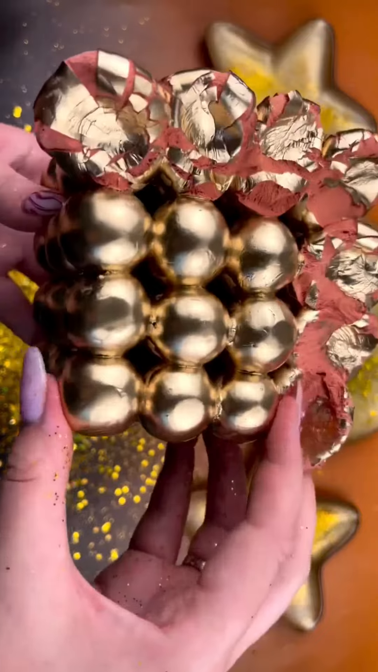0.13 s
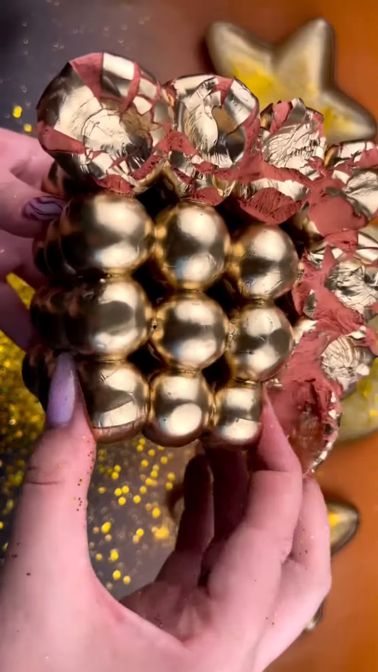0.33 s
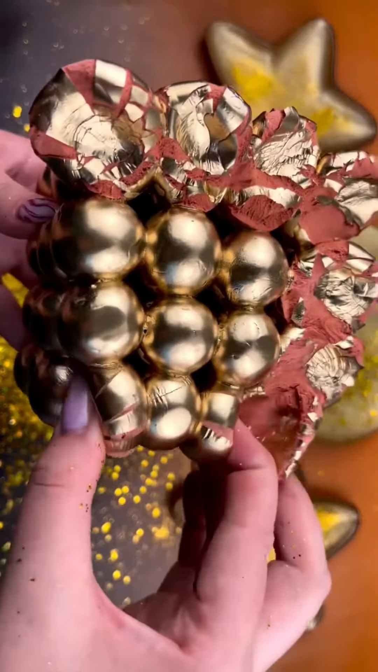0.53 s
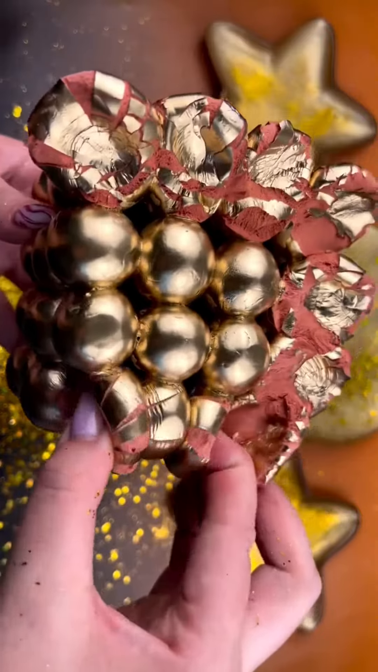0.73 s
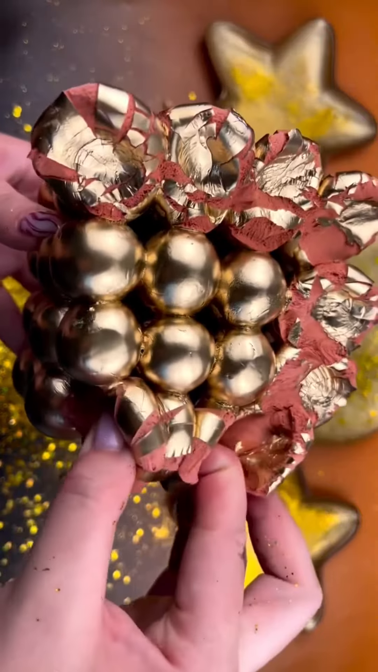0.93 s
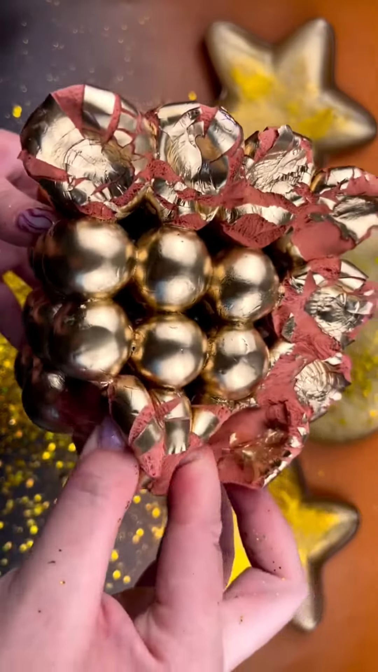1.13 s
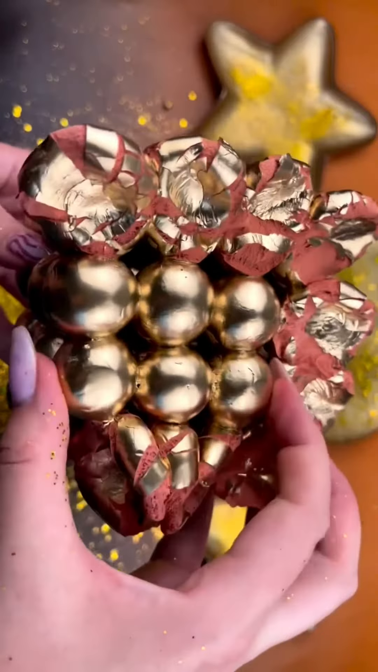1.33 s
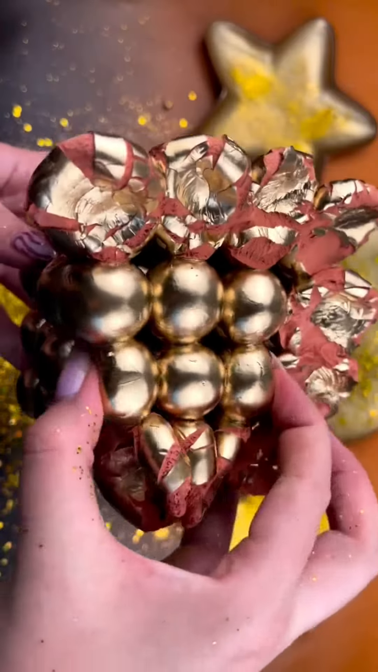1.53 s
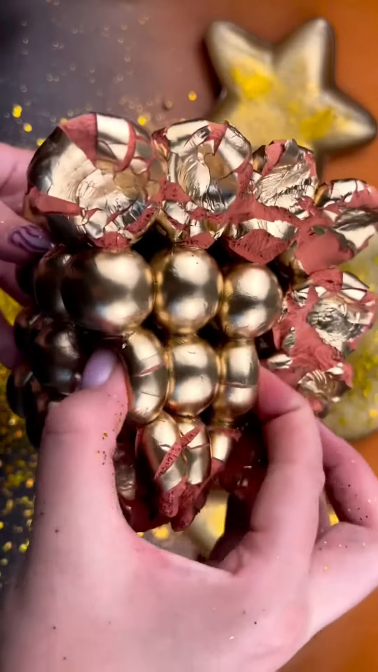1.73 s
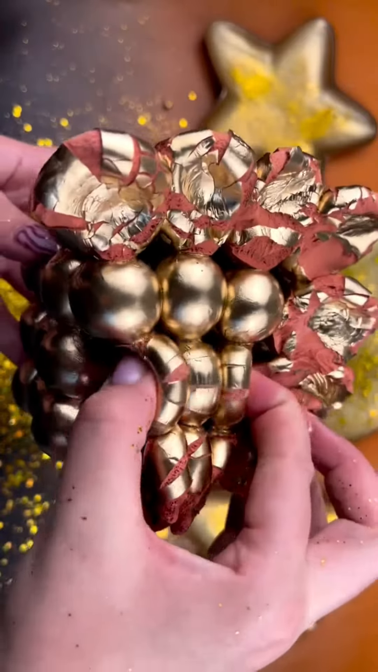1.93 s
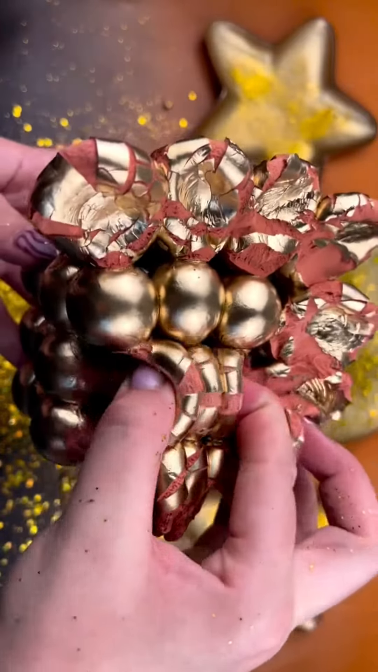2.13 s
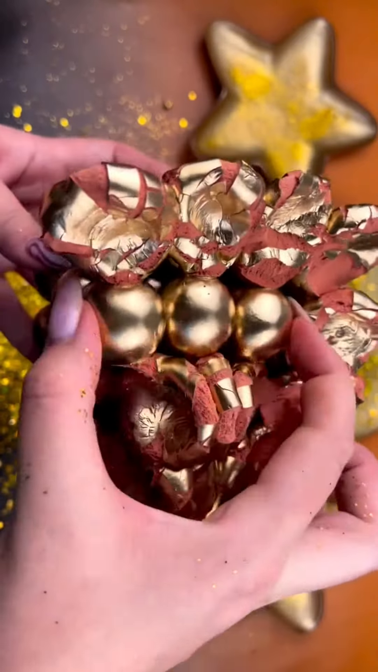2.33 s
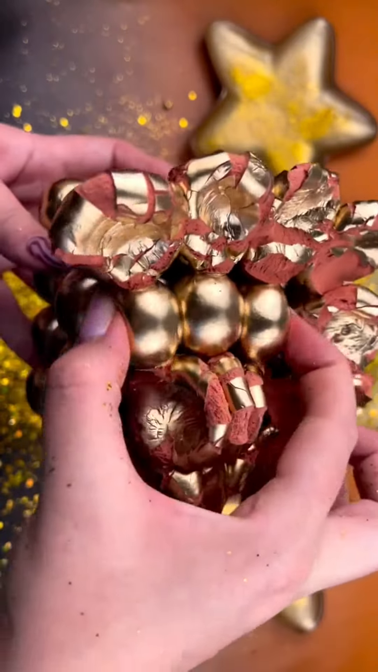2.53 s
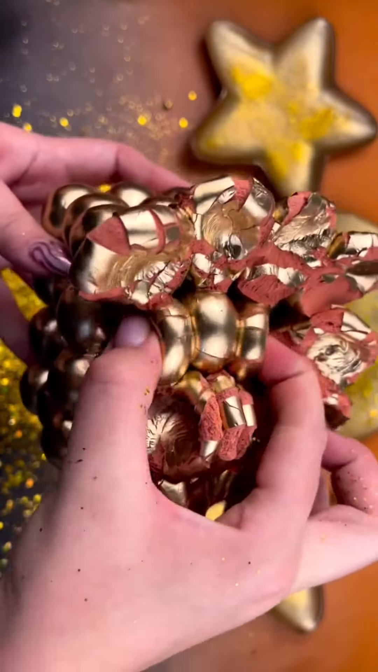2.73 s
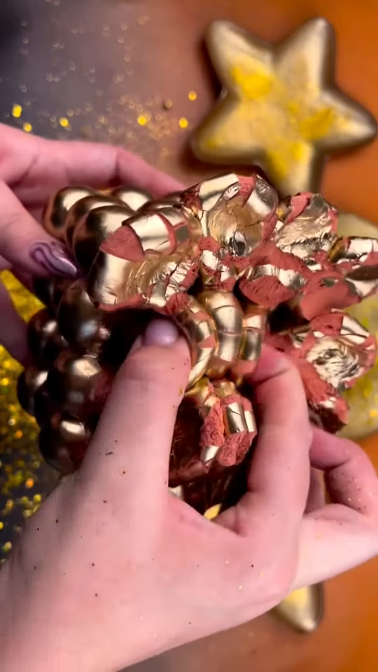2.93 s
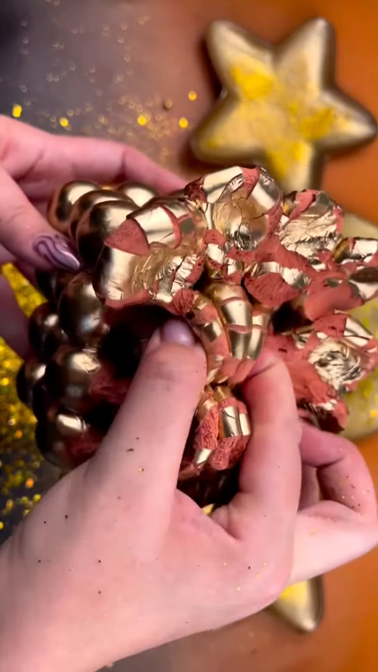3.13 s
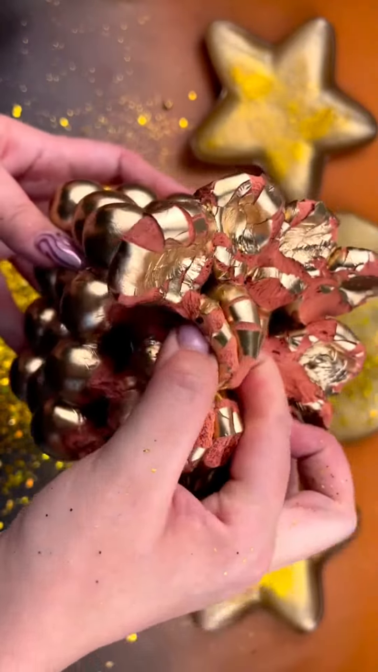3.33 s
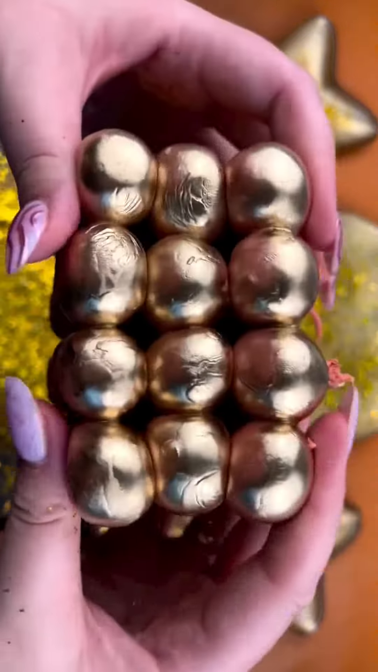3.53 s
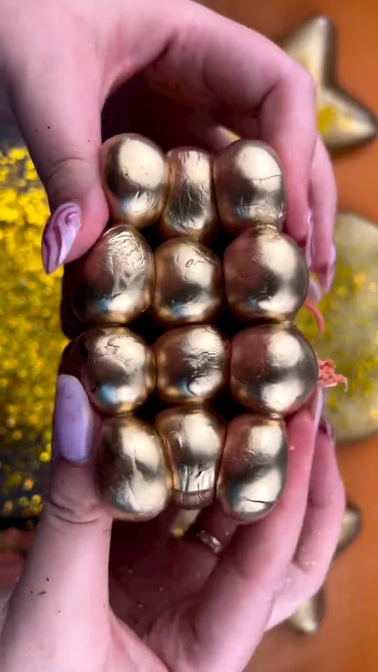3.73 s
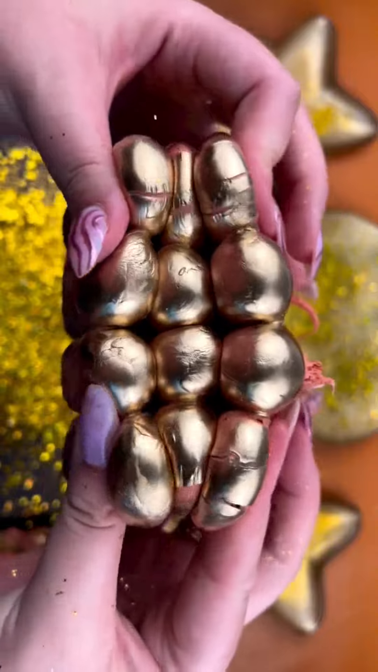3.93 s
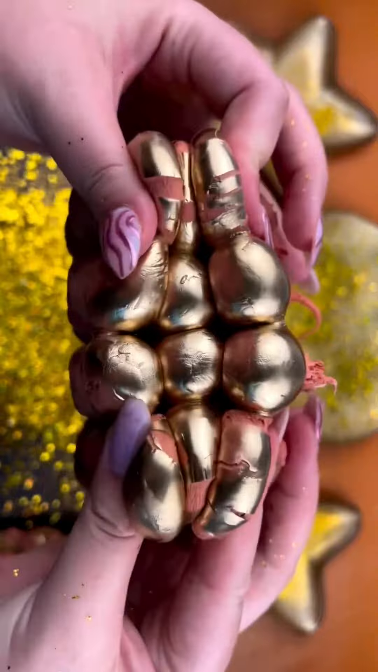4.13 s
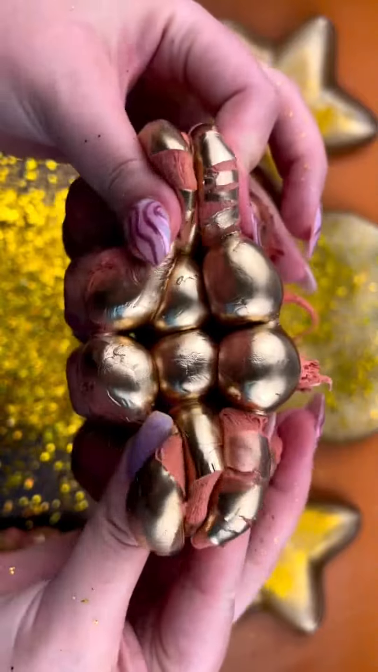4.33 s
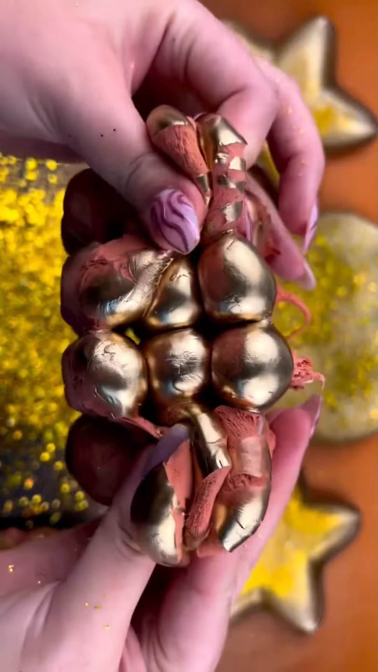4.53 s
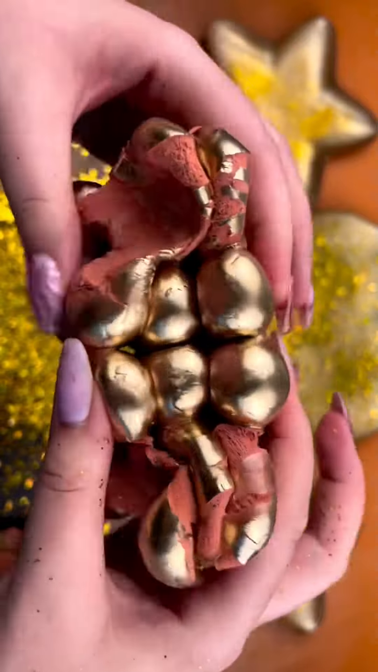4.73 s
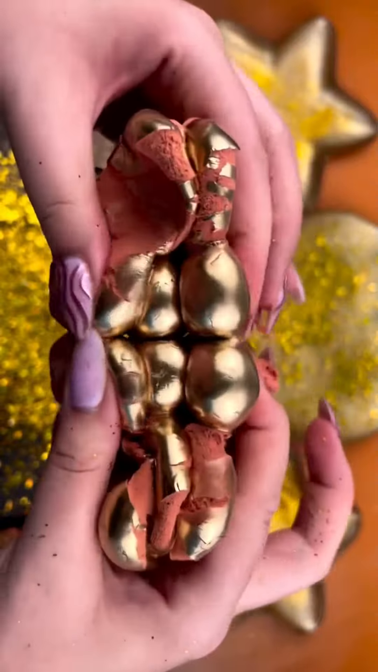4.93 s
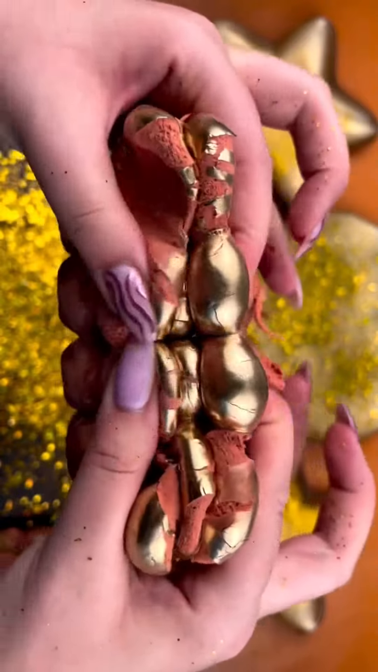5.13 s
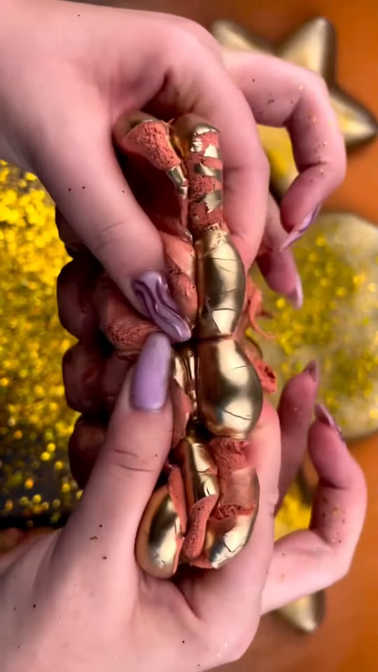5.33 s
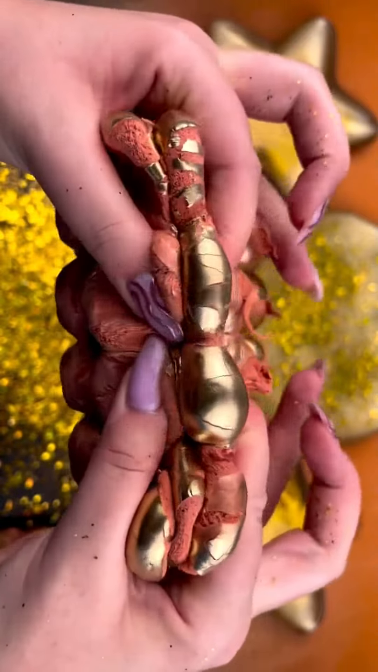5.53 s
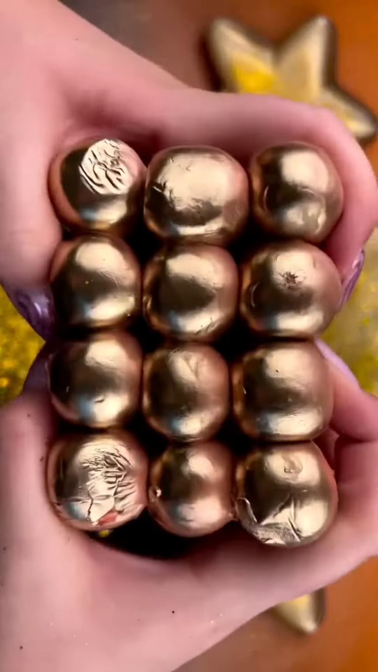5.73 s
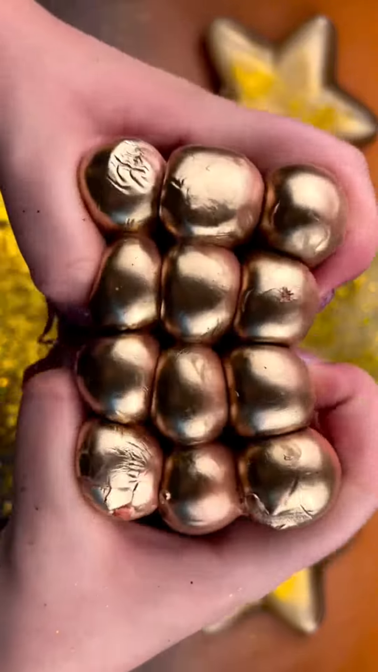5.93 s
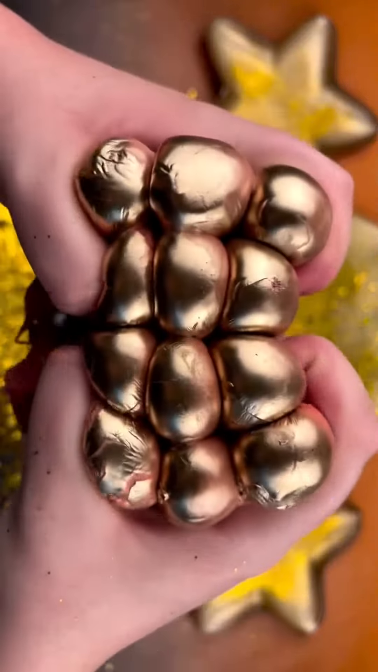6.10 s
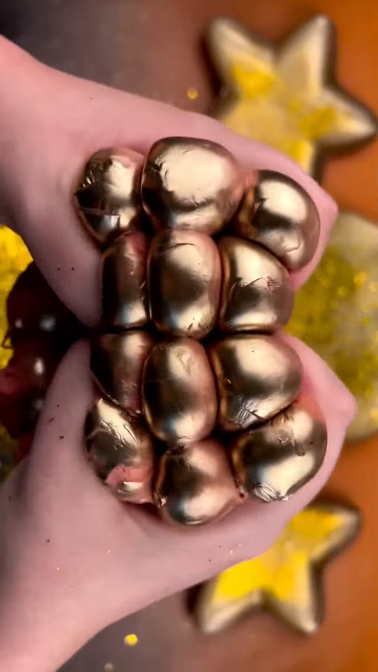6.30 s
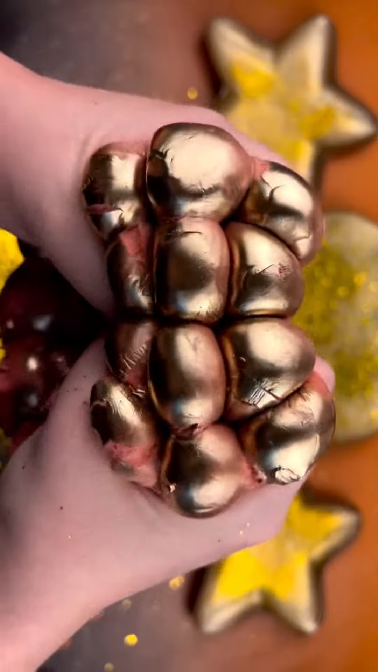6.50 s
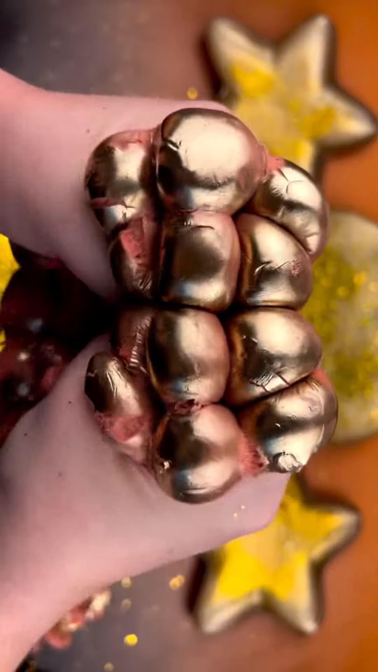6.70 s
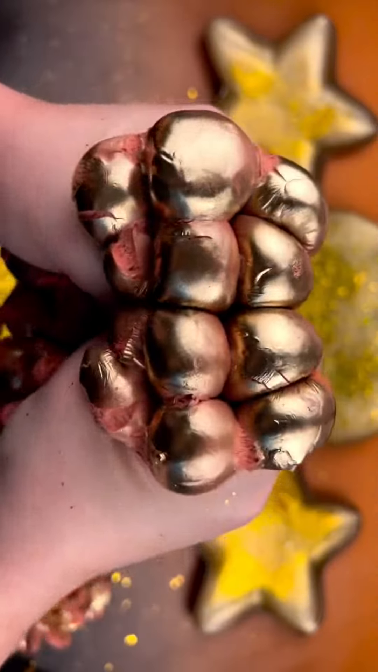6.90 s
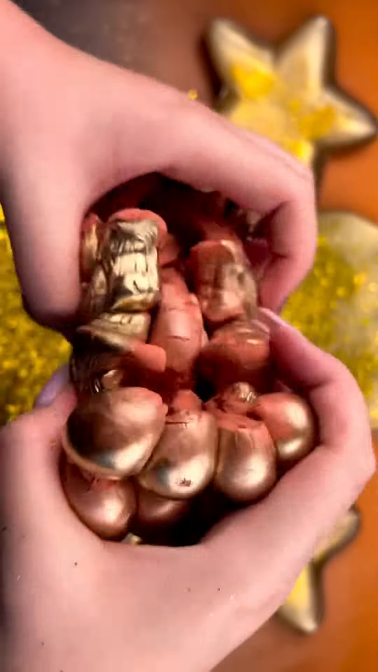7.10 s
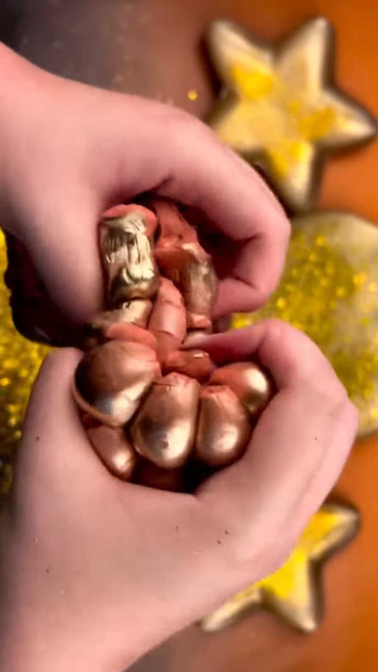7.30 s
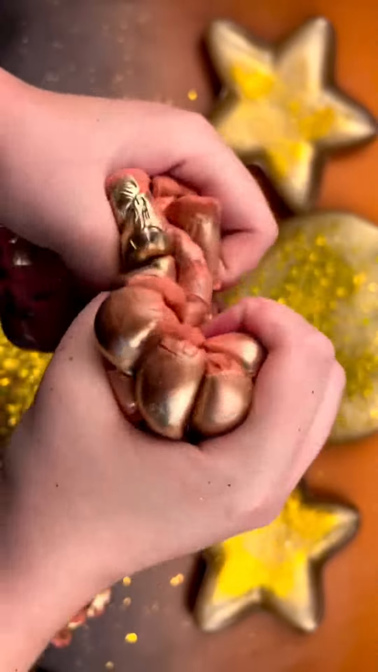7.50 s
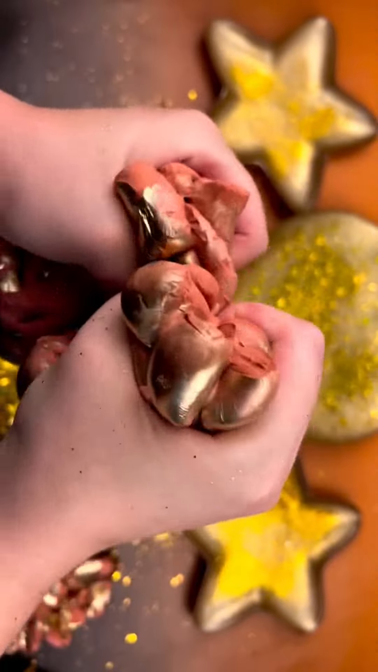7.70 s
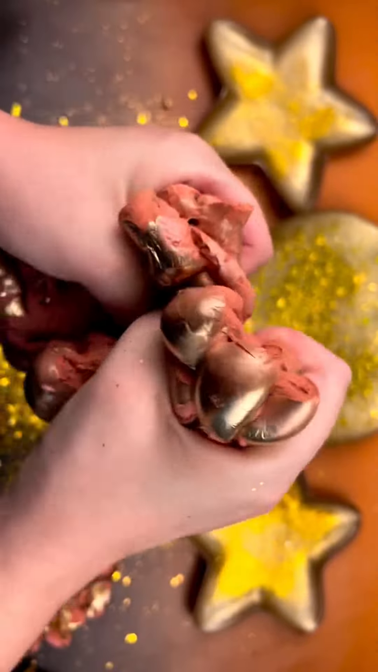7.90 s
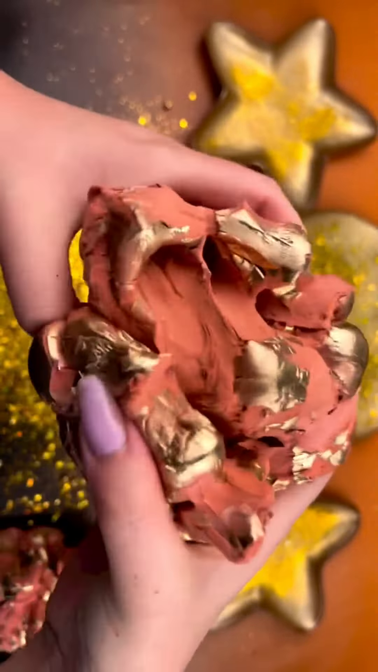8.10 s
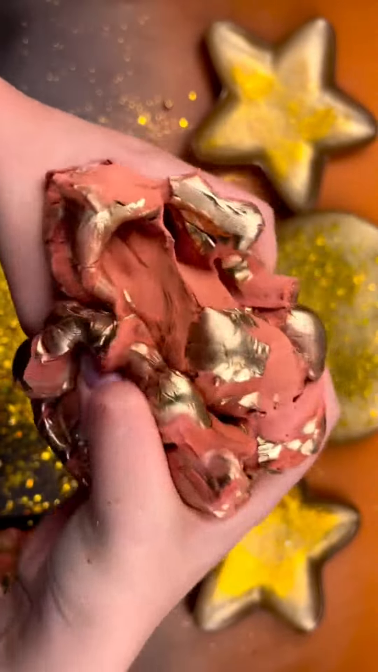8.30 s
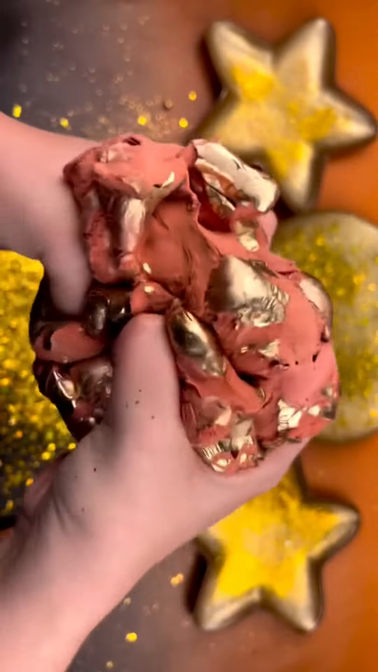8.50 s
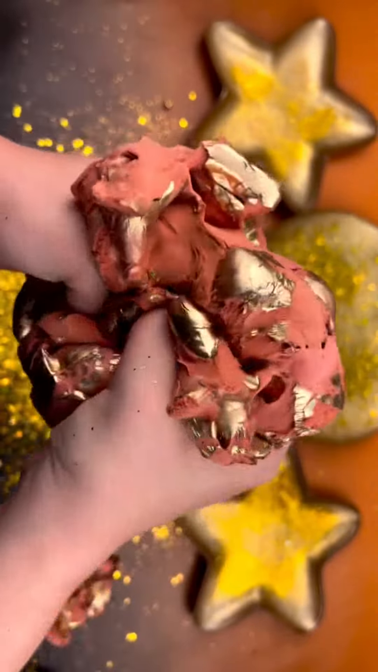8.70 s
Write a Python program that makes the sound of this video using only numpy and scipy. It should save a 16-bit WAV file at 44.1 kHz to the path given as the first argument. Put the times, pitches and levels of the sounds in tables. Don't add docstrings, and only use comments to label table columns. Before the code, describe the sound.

Crisp, dry cracking of a brittle shell on soft clay, near and detailed. Early snaps ring slightly hollow, as unbroken balls resonate; later ones are drier and thicker. Squeezes come in bursts, each a flurry of clicks, ticks and crinkles with a few soft low pops, thinning to near silence before the next. The thickest crunch comes past the middle. Faint room rumble and hiss, very little reverberation.

```python
import sys
import numpy as np
from scipy import signal
from scipy.fft import rfft, irfft, next_fast_len
from scipy.io import wavfile
from scipy.ndimage import map_coordinates

SR = 44100
rng = np.random.default_rng(int(sys.argv[2]) if len(sys.argv) > 2 else 0)


def master(y):
    cut = np.clip(np.atleast_2d(y).T, -1, 1)
    pcm = np.round(cut * 32767)
    wavfile.write(sys.argv[1], SR, pcm.astype(np.int16))


def nominal_scale(level):
    x = np.asarray(level, float) / 20
    return 10 ** x


N = 385950
SNAP_DB = 8.5


def unit(x):
    return x / np.sqrt(np.mean(x ** 2) + 1e-20)


def along(points, hz):
    f, v = np.transpose(points)
    return np.interp(np.log(hz + 1), np.log(f + 1), v)


def filtered(x, response):
    m = next_fast_len(N + SR // 2)
    return irfft(rfft(x, m) * response(np.fft.rfftfreq(m, 1 / SR)), m)[..., :N]


def causal(points, size=2048):
    cepstrum = irfft(np.log(nominal_scale(along(points, np.fft.rfftfreq(size, 1 / SR))) + 1e-6), size)
    cepstrum[1:size // 2] *= 2
    cepstrum[size // 2 + 1:] = 0
    pulse = irfft(np.exp(rfft(cepstrum)), size)[:size // 2]
    return pulse / np.linalg.norm(pulse)


SCENE_CHANGES = [
    1.291,
    2.352,
    3.437,
    4.764,
    5.707,
    7.068,
    8.043,
]


def scatter(seconds, shapes):
    index = np.round(seconds * SR).astype(int)[:, None] + np.arange(shapes.shape[1])
    take = np.searchsorted(SCENE_CHANGES, index / SR)
    same_take = take == take[:, :1]
    return np.bincount(index.ravel(), (shapes * same_take).ravel(), N + SR)[:N]


# time of full force in seconds, hold in seconds,
# crackle level in dB, typical flake resonance in Hz.
SQUEEZES = [(0.02, 0.26, -58, 3860), (0.41, 0.03, -29.5, 3860), (0.64, 0.12, -35.5, 3630),
            (0.94, 0.042, -29.5, 3800), (1.16, 0.045, -44, 3300), (1.5, 0.099, -46, 3470),
            (1.648, 0.35, -33, 3450), (2.13, 0.062, -32, 2930), (2.41, 0.073, -51, 3340),
            (2.548, 0.23, -38, 3180), (2.83, 0.2, -31.5, 2870), (3.33, 0.11, -48.5, 3000),
            (3.682, 0.31, -29.5, 3220), (4.05, 0.3, -36, 2920), (4.57, 0.34, -41, 3830),
            (4.766, 0.028, -47, 2950), (4.97, 0.49, -30.5, 3400), (5.659, 0.05, -34, 2900),
            (5.745, 0.084, -46, 3450), (5.918, 0.52, -20.5, 2700), (6.58, 0.13, -29, 3160),
            (7.04, 0.03, -34, 3000), (7.101, 0.17, -26.5, 2520), (7.29, 0.39, -28, 3100),
            (7.75, 0.037, -35, 2900), (7.936, 0.01, -60, 2400), (7.975, 0.029, -22, 2310),
            (8.065, 0.012, -33.5, 3000), (8.218, 0.06, -31, 2800), (8.35, 0.12, -26.5, 3000),
            (8.561, 0.35, -29.5, 3100)]


def squeeze(seconds):
    grip, tire, let_go = 263.5, 0.5, 73
    resting_db, resting_hz = -68.5, 2700
    fade_in_db, fade_in_s = -18, 0.017
    start, held, db, hz = np.transpose(SQUEEZES)[..., None]
    since = seconds - start
    force_db = db + grip * np.minimum(since, 0)
    force_db = force_db - tire * np.clip(since, 0, held) - let_go * np.maximum(since - held, 0)
    same_take = np.searchsorted(SCENE_CHANGES, start) == np.searchsorted(SCENE_CHANGES, seconds)
    power = nominal_scale(2 * force_db) * same_take

    openings = SCENE_CHANGES[4:6]
    opened = seconds - np.array([-1, *openings])[np.searchsorted(openings, seconds)]
    power *= nominal_scale(2 * fade_in_db * np.clip(1 - (opened / fade_in_s) ** 2, 0, 1))

    rest = nominal_scale(2 * resting_db)
    total = power.sum(axis=0) + rest
    pitch_hz = ((power * hz).sum(axis=0) + rest * resting_hz) / total
    level_db = 10 * np.log10(total)
    bright_db = -0.06 - 0.19 * (level_db + 14.5) + 2.5 * np.log2(pitch_hz / 3200)
    return level_db, bright_db, pitch_hz


# frequency in Hz, spectral level in dB per Hz.
ROOM_TONE = [(25, -40), (50, -15.5), (108, -13.5), (179, -22), (385, -20), (1100, -39), (3840, -43),
             (13400, -41.5)]


def room_tone():
    knots = np.arange(200) / 20
    drift_db = 2 * rng.standard_normal(len(knots)) + 0.19 * squeeze(knots)[0]
    noise = unit(filtered(rng.standard_normal(N), lambda hz: nominal_scale(along(ROOM_TONE, hz))))
    return nominal_scale(-58.0 + np.interp(np.arange(N) / SR, knots, drift_db)) * noise


def flake_pitch(seconds, scatter_share):
    return squeeze(seconds)[2] * np.exp(scatter_share * rng.standard_normal(len(seconds)))


# frequency in Hz, level in dB.
SHELL = [(25, -22.5), (80, -7), (260, -4.5), (827, -6.5), (1540, -2.5), (2570, -4), (6750, -4), (12000, -3),
         (13400, -4.5)]


def fractures(seconds, level_db, bright_db, flake_hz, size, lead, click_t60, ring_t60, ring_db, q,
              thin, damped, sharp, swell_db):
    t = np.arange(size) / SR - lead
    chance = rng.standard_normal((len(seconds), size + 2))
    noise = chance[:, 2:]
    life = np.exp(0.15 * chance[:, :1])

    swell = nominal_scale(swell_db + 24 * t / lead)
    break_itself = sharp * np.sign(chance[:, 1:2]) * (np.abs(t) < .5 / SR)
    click = (noise + break_itself) * np.where(t < 0, swell, nominal_scale(-60 * t / click_t60))
    ring = noise * (t >= 0) * nominal_scale(ring_db + chance[:, 1:2] - 60 * t / (ring_t60 * life))

    ratio = np.fft.rfftfreq(size, 1 / SR) / flake_hz[:, None]
    resonance = 1j * ratio / (1 - ratio ** 2 + 1j * ratio / q)
    flake = (1 + resonance) * 1j * ratio / (1j * ratio + thin)
    damped_ring = rfft(ring, axis=1) * (1 + resonance / 2) / (1 + 1j * ratio / damped)
    body = (rfft(click, axis=1) + damped_ring) * flake

    edge = np.minimum(1.8, 6500 / flake_hz[:, None])
    high = 1 / (1 + (edge / (ratio + .001)) ** 4)
    shapes = irfft(body * (1 - high + high * nominal_scale(bright_db)[:, None]), size)
    onset = shapes[:, :round((lead + .0015) * SR)]
    shapes = shapes * (nominal_scale(level_db) / np.linalg.norm(onset, axis=1))[:, None]
    return signal.fftconvolve(scatter(np.abs(seconds - lead), shapes), causal(SHELL))[:N]


def lull_db(seconds):
    cracks = np.sort(np.concatenate([SNAPS[:, 0], TICKS[:, 0], np.transpose(TEARS)[0], [N / SR]]))
    after = np.searchsorted(cracks, seconds).clip(1)
    apart = np.minimum(np.abs(cracks[after] - seconds), np.abs(seconds - cracks[after - 1]))
    lull = -7 * (1 - np.exp(-(apart / .012) ** 2)) + 3
    return lull * (seconds < SCENE_CHANGES[4])


def crackle(count=10000):
    chance = rng.random((count, 3))
    at = chance[:, 0] * N / SR
    clumps = map_coordinates(rng.standard_normal(1100), [at * 120])
    force_db, bright_db, _ = squeeze(at)
    worn_db = 0.27 * (at - SCENE_CHANGES[1]) * (at > SCENE_CHANGES[4])
    spiky_db = 3.7 + 0.09 * np.clip(force_db + 45, 0, 17) - worn_db
    uneven_db = spiky_db * (clumps / 2 - np.log(chance[:, 1] + .05) - 2)
    level_db = force_db + uneven_db + 19 + lull_db(at)
    bright_db = bright_db + 12 * (chance[:, 2] - .5)
    hz = flake_pitch(at, scatter_share=0.3)
    return fractures(at, level_db, bright_db, hz, size=384, lead=.001, q=1.78, damped=8.0,
                     click_t60=.0015, ring_t60=.009, ring_db=-5, thin=.2, sharp=4, swell_db=-8)


# time in seconds, peak level in dB, bright edge over the body in dB,
# flake resonance in Hz.
LOUD_CRACKS = [(0.0929, -29, 10, 5660), (0.101, -20, -3.5, 5700), (0.1309, -28, -2, 3770),
               (0.2075, -22.5, 5, 3420), (0.214, -20.5, 6, 5400), (0.2824, 1, -10, 4800),
               (0.2943, -14, -17, 3100), (0.3136, 3.5, -10.5, 4670), (0.3252, 3, -0.5, 3220),
               (0.4036, 3, -7, 5230), (0.4958, -9.5, -8, 3400), (0.503, 2, -5.5, 3180),
               (0.5515, -6.5, -3, 3170), (0.5751, 2.5, 0, 3190), (0.6386, 8, -9, 4600),
               (0.6614, -0.5, -4, 3190), (0.7046, -9.5, -5, 5560), (0.7967, -5.5, -16, 4910),
               (0.8007, -3.5, -3, 5080), (0.836, -10.5, -4, 4630), (0.8539, -2.5, 5.5, 3180),
               (0.9176, -14, 8, 5170), (0.921, 0.5, -5.5, 4900), (1.0907, -15, -14, 3300),
               (1.1211, -13.5, -5, 1580), (1.1394, -14, -5.5, 3420), (1.2061, -17, -19, 3640),
               (1.2896, -22, -6, 5650),
               (1.3838, -45, -22, 1570), (1.428, -20.5, 0, 3060), (1.4516, -11.5, -0.5, 3080),
           (1.4847, -18.5, -1, 3170), (1.5244, -7, 2, 2960), (1.5934, -4, 1, 2980), (1.6, -8, -11, 3150),
           (1.6135, -3, -4, 3210), (1.631, -2.5, -2, 3170), (1.646, -5, -2, 3080), (1.672, 3, -11.5, 4310),
           (1.686, -10, -9, 3080), (1.711, -9, -5, 2820), (1.716, 1.5, -9, 3060), (1.767, 1, 0, 3180),
           (1.7816, 1, -1.5, 3650), (1.8086, 2.5, 0.5, 2920), (1.818, 2, -18, 3940),
           (1.8482, -1.5, -2, 2910), (1.8718, 9.5, -2, 3500), (1.8919, 3, 1.5, 2900),
           (1.9525, -2.5, -4, 3750), (2.01, -11.5, -5, 3200), (2.026, -10.5, 13, 3420),
           (2.064, -4, 1, 3230), (2.16, -1.5, 20, 4800), (2.1825, -11, 2, 3190), (2.2121, -4, -13, 3160),
           (2.2487, -10, -6, 3020), (2.2802, -1.5, 1, 3280), (2.3071, -10, 0, 3680),
           (2.3297, -6, -19, 5940), (2.338, -8.5, 0, 1740),
               (2.395, -4, -4.5, 3470), (2.485, -13, 0.5, 3230), (2.516, -10, 0, 3100),
             (2.5219, 1.5, -5.5, 3340), (2.5631, -3.5, -7, 3240), (2.5715, 0.5, 3, 3170),
             (2.5853, -3, -12.5, 3100), (2.612, 2.5, -10.5, 3900), (2.638, -3.5, -6, 3170),
             (2.6462, -3, -4, 4130), (2.6511, -4, -8, 3280), (2.678, -1, -2.5, 2890),
             (2.7124, -8.5, 5, 3320), (2.731, -3.5, -1, 3400), (2.7476, 1.5, -9.5, 2930),
             (2.767, -5.5, -15, 4760), (2.771, -2.5, -15, 4560), (2.802, 4, -1.5, 3150),
             (2.863, -4.5, 4.5, 3100), (2.889, -2, 24, 3470), (2.9482, -1.5, 8, 1830),
             (2.9849, 2, -1, 3400), (3.0001, -3, -12, 3260), (3.091, -8.5, -4, 3440),
             (3.1125, -6, -1, 3140), (3.1299, -2, 4, 1630), (3.1617, -3, 9, 3120),
             (3.1902, -7.5, -2.5, 3060), (3.24, -11.5, -2, 3750),
               (3.5647, -13.5, -1, 2730), (3.5735, -22, -7, 4780), (3.6186, -4.5, 0, 3600),
               (3.6397, -1, -7, 2700), (3.6612, -5.5, -13, 2800), (3.6746, -1.5, -13.5, 4400),
               (3.7484, 0, 4, 3680), (3.7812, 1, -0.5, 3400), (3.79, 3.5, -11.5, 3330),
               (3.8193, -0.5, -6, 3000), (3.8423, 2.5, -10, 3200), (3.878, 0.5, -5, 3560),
               (3.888, -1, -16, 4400), (3.9402, 4.5, -7.5, 4430), (3.978, -2, -7, 3320),
               (4.047, -1.5, 1.5, 3400), (4.053, 0, 7, 4400), (4.148, -3.5, 6, 5500),
               (4.1677, -6, -15, 3400), (4.181, 2, -4, 3680), (4.2327, -1.5, -11, 2880),
               (4.2725, -9, 7, 1600), (4.292, -6, 0, 3170), (4.3414, -7.5, -5, 3000),
               (4.3695, -7.5, -4, 4530), (4.4462, -4.5, -3, 3140), (4.4659, 4, 2, 1890),
               (4.5033, -4, -5, 3170), (4.5062, -10.5, -15, 3550),
               (4.531, -13.5, 5, 3940), (4.6335, -18.5, 0, 5360), (4.7529, -14.5, 1, 3340),
                 (4.76, -9.5, -10, 3580), (4.7968, -10.5, -2, 2720), (4.8135, -11, -4, 3800),
                 (4.8607, -1, -3, 3270), (4.9025, -10, 2, 4310), (4.9098, -4, -7, 2870),
                 (4.9356, -9, -3, 3170), (4.9663, 0.5, 3, 2560), (4.984, -6, -12, 3250),
                 (5.0012, 3, -4, 3260), (5.015, -2.5, -15, 5600), (5.048, 3.5, -9, 3900),
                 (5.0834, -10, -5, 3320), (5.1008, -0.5, -6.5, 3200), (5.1426, -0.5, -5.5, 3220),
                 (5.188, 0.5, 8, 3970), (5.2088, -4.5, -12, 3180), (5.262, -4, -10, 3940),
                 (5.279, -2, -6, 3380), (5.3332, 1, 7, 3290), (5.421, -5, -6, 2680),
                 (5.43, -6.5, -15, 3400), (5.458, -3, -8.5, 3400), (5.5274, -7, -4, 3540),
               (5.7257, -6.5, -9, 3980), (5.75, -14, -8, 2970), (5.808, -5.5, -1, 2930),
               (5.8345, -1, -5, 3550), (5.843, -1.5, -2, 3700), (5.8713, 3.5, -2, 3330),
               (5.8935, 5.5, -2.5, 2900), (6.0418, 4.5, -7, 2760), (6.4891, 1, -19, 3400),
               (6.5391, -4, -9, 3420), (6.5457, -0.5, -5, 3320), (6.6004, -1, 2.5, 3580),
               (6.608, -5, 0, 6060), (6.804, -10, 9, 3790), (6.836, -5, -7.5, 2850),
               (6.8807, -6, -4.5, 3120), (7.049, -19, -17, 3170),
               (7.0888, -4, -15, 3680), (7.124, -0.5, 3, 3080), (7.1492, -7.5, 19, 5210),
           (7.2174, 1.5, -0.5, 3600), (7.3173, -4, 9, 3850), (7.347, -5.5, -12, 1830),
           (7.3658, 1.5, -5, 3360), (7.405, -8, -16, 3980), (7.456, 0, -3, 3500), (7.475, -3.5, -7, 3820),
           (7.536, 2.5, -5.5, 4680), (7.5955, 1, 0, 3440), (7.5998, -5, -6, 5680), (7.6862, 3, 17, 5260),
           (7.74, -3.5, -7, 5990), (7.7913, -1.5, -21, 6100),
               (7.253, -4.5, -2, 3300),
    (7.27, -14.5, -8, 1810),
    (8.1934, -8, -8, 2900),
    (8.2543, -10, -4, 1680),
    (8.3056, -8.5, -18, 3060),
    (8.4, -24, 5, 3550),
    (8.6286, -4, 13, 2710),
]
SNAPS = np.array(LOUD_CRACKS)


def snaps():
    s, db, edge_db, hz = SNAPS.T
    late_s = 0.00005
    return fractures(s + late_s, db + SNAP_DB, 1.08 * edge_db + 6.5, hz, size=1024, q=1.63, ring_db=-13,
                     damped=5.5, ring_t60=.022, lead=.003, click_t60=.002, thin=.3, sharp=5, swell_db=-20)


# time in seconds, peak level in dB.
SMALL_CRACKS = [(0.2648, -24), (0.2721, -26.5), (0.3425, -14.0), (0.4446, -10), (0.4567, -23), (0.466, -12),
                (0.5359, -32), (0.5467, -2), (0.5802, -4.5), (0.5848, -9.5), (0.5914, -8), (0.6, -15),
                (0.6127, -7), (0.6171, -3), (0.6578, -9.5), (0.7247, -10), (0.7352, -14), (0.8144, -16.5),
                (0.9023, -10), (0.9352, -10.5), (0.951, -7), (0.9734, -10.5), (0.982, -16), (0.9957, -13.5),
                (1.0474, -21.5), (1.0595, -22.5), (1.5631, -21), (1.6081, -11.0), (1.6541, -11),
                (1.7259, -13), (1.7395, -6.5), (1.763, -11), (1.8233, -2), (1.9165, -7), (1.9345, -14),
                (2.03, -13.0), (2.0588, -13), (2.0938, -1.5), (2.1355, -8), (2.1468, -17), (2.342, -17),
                (2.5033, -16.5), (2.5405, -22.5), (2.5812, -2.5), (2.6203, -6), (2.8279, -9.5), (2.8475, -6),
              (2.8541, -9.5), (2.915, -7.5), (3.0374, -10.5), (3.0715, -19), (3.1662, -12.0),
              (3.1733, -9.5), (3.2326, -13.5), (3.3808, -28), (3.6492, -1.5), (3.7254, 0.5), (3.7575, -5),
              (3.7616, -10.0), (3.7722, -13), (3.799, -3), (3.8336, -7), (3.8814, -10.5), (3.918, -4),
              (3.952, -7.5), (3.9654, -14), (3.9891, -6.5), (3.9982, -7), (4.0176, -7.5), (4.0852, -8.5),
              (4.1, -9.5), (4.12, -13), (4.1434, -5), (4.1997, -1), (4.2055, -5), (4.218, -11),
              (4.2548, -6.5), (4.301, -13), (4.401, -14), (4.4113, -6.5), (4.559, -21.0),
                (4.9474, -23), (5.044, -7), (5.1635, -2), (5.2004, -6), (5.2187, -13), (5.236, -15),
                 (5.297, -9), (5.3024, -9.0), (5.3062, -8.0), (5.3148, -6), (5.341, -6), (5.4014, -10),
                 (5.5019, -34), (5.6618, -29), (5.7917, -17.5), (5.8594, -5), (6.1866, -11), (6.2364, -18),
                 (6.2477, -29), (6.2683, -29), (6.2986, 2), (6.331, -12), (6.344, -18), (6.4302, -19),
                 (6.4617, -8), (6.6475, -3), (6.6522, -3), (6.697, -8),
                (6.7135, -20), (6.7805, -16.0), (6.8926, -12), (7.064, -14), (7.11, -22), (7.1659, -15),
               (7.3249, -4), (7.3419, -8), (7.3621, -10), (7.3916, -2), (7.4182, -7), (7.445, -12),
               (7.482, -10), (7.5726, -9.0), (7.647, -23), (7.7074, -7), (8.019, 4.5), (8.0415, -28),
               (8.1012, -11), (8.2246, -4.5), (8.4187, -10.0), (8.5165, -14), (8.5455, -25), (8.6067, -26),
               (8.662, -12)]
TICKS = np.array(SMALL_CRACKS)


def ticks():
    s, db = TICKS.T
    hz = flake_pitch(s, scatter_share=.13)
    return fractures(s, db + SNAP_DB, squeeze(s)[1] - 2, hz, size=1024, q=1.5, damped=6.0, ring_db=-12.5,
                     ring_t60=.018, lead=.003, click_t60=.0025, thin=.4, sharp=4.5, swell_db=-13)


# time in seconds, peak level in dB, flake resonance in Hz.
TEARS = [(0.621, -14, 6170), (2.8086, -6, 3070), (3.69, -4.5, 2900), (3.7164, -9.5, 1840),
         (3.792, -2, 6030), (3.8993, -5.0, 4330), (3.9229, 3, 3270), (5.9066, 0, 2770),
         (5.9137, -4.5, 4820.0), (5.9326, -12, 3620.0), (5.963, -6, 2840), (5.9733, -1.5, 2680),
         (5.99, 0.5, 2890.0), (6.004, 1.5, 3230.0), (6.0087, -1.0, 3750.0), (6.0228, -4, 1870),
         (6.0293, 2, 4650.0), (6.0601, -1, 3700.0), (6.0947, 0, 3370), (6.1161, 3, 2840),
         (6.1223, -3, 3750.0), (6.1342, -3.0, 3040), (6.1443, -4.0, 2670.0), (6.1744, 2.5, 3430),
         (6.2065, -1.0, 2900), (6.2212, -4.0, 3270.0), (6.3674, -4, 4610.0), (6.3728, 1, 3570.0),
         (6.3815, -4.0, 3700.0), (6.4048, -2, 4270), (6.4169, -2, 3700), (7.5613, -5, 3480),
         (7.9701, -2, 3170), (7.9884, -1, 3200), (7.9952, 1.5, 2220), (8.007, -2, 2200.0),
         (8.0251, -0.5, 2000), (8.4352, -4.5, 3830.0)]


def tears():
    s, db, hz = np.transpose(TEARS)
    return fractures(s, db + SNAP_DB, squeeze(s)[1] - 5, hz, size=1024, q=2.15, damped=6.5, ring_db=-5.5,
                     ring_t60=.018, lead=.003, click_t60=.006, thin=.35, sharp=2, swell_db=-5)


def lagging(hz):
    low = np.clip(hz, 30, 2000)
    return np.exp(-2j * np.pi * 1.15 * (np.log(low / 2000) - low / 2000 + 1))


# frequency in Hz, bandwidth in Hz, level in dB.
HOLLOW = [(1453, 225, -2), (3170, 270, -4)]


def hollow(x):
    def modes(f):
        return sum(nominal_scale(db) * 1j * f * width / (centre * centre - f * f + 1j * f * width)
                   for centre, width, db in HOLLOW)

    first_block = np.arange(N) < SCENE_CHANGES[2] * SR
    return first_block * filtered(x, modes)


# start in seconds, level in dB.
POPS = [(0.3132, -27), (0.406, -27.5), (0.576, -22.5), (0.6617, -30), (0.95, -31), (0.973, -23),
        (1.8724, -19.5), (2.3951, -30), (2.646, -26.5), (2.713, -22), (3.131, -29), (4.046, -18),
        (4.861, -30), (4.966, -21.5), (5.19, -28), (6.54, -20.5), (6.838, -39), (7.124, -18.5),
        (7.318, -23), (7.5622, -24.5), (7.687, -21), (7.762, -29.5), (8.005, -14), (8.0239, -15),
        (8.403, -19.5)]


def thumps():
    s, db = np.transpose(POPS)
    t = np.arange(1, 1500) / SR
    phase = 2 * np.pi * 1.165 * np.log(1 + t / 0.00064)
    sweep = np.sin(phase) * nominal_scale(-60 * t / 0.059) / (1 + t / 0.0056)
    return scatter(s, nominal_scale(db - 1.0)[:, None] * sweep)


# frequency in Hz, 60 dB decay time in seconds.
ROOM = [(300, 0.34), (3000, 0.18), (12000, 0.096)]


def room(x):
    answer = np.zeros(N)
    take = np.searchsorted(SCENE_CHANGES, np.arange(N) / SR)
    for k in range(len(SCENE_CHANGES) + 1):
        hz, t, z = signal.stft(rng.standard_normal(SR // 3), SR, nperseg=256)
        decay = nominal_scale(-60 * t / along(ROOM, hz)[:, None])
        tail = signal.istft(z * decay, SR, nperseg=256)[1]
        tail = np.pad(tail, (200, 0)) / np.linalg.norm(tail)
        part = x[take == k]
        answer[take == k] = signal.fftconvolve(part, tail)[:len(part)]
    return answer


def scene():
    shell = filtered(snaps() + ticks() + tears() + crackle(), lagging)
    near = shell + hollow(shell) + thumps()
    return (near + nominal_scale(-15.5) * room(near) + room_tone())[None]


def band_limit(x):
    return signal.sosfilt(signal.butter(12, 14160, fs=SR, output="sos"), x)


def record(dry):
    rounded = dry / (1 + np.abs(dry / 1.1) ** 3) ** (1 / 3)
    rounded = dry + filtered(rounded - dry, lambda hz: .4 + .6 / (1 + (900 / (hz + 1)) ** 4))
    band = filtered(rounded, lambda hz: 1 / (1 + (hz / 13120) ** 90))
    return band_limit(np.clip(band, -1, 1))


dry = scene()
out = record(dry)
master(out)
```